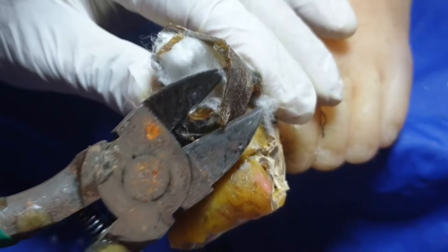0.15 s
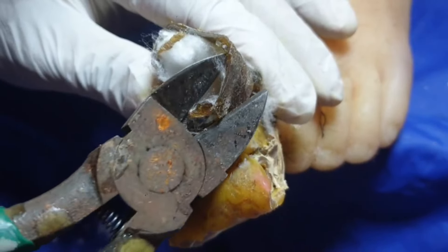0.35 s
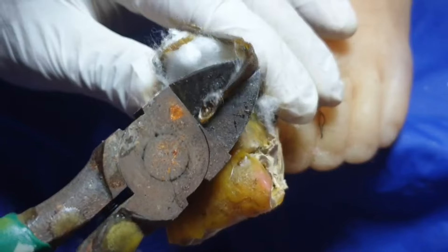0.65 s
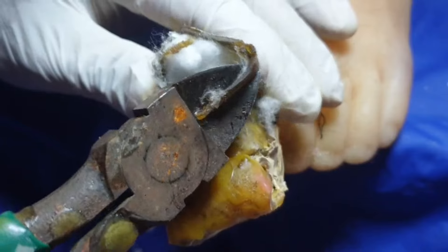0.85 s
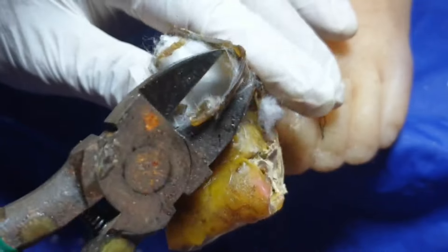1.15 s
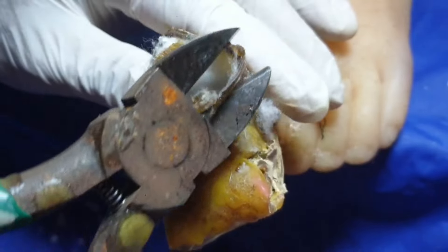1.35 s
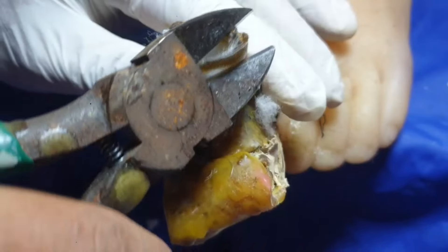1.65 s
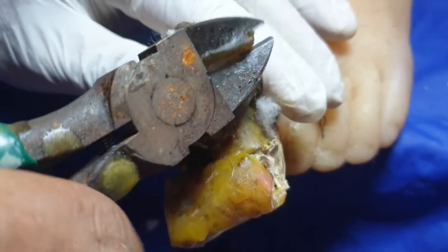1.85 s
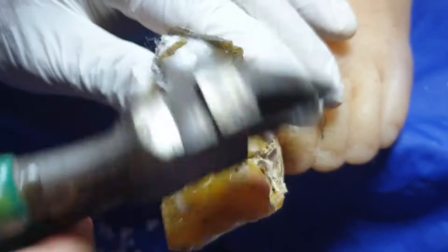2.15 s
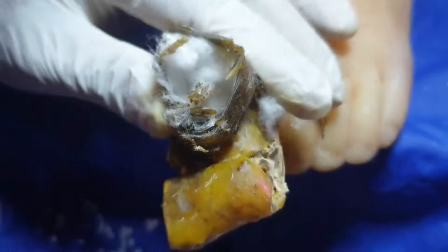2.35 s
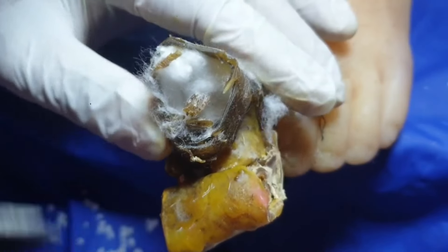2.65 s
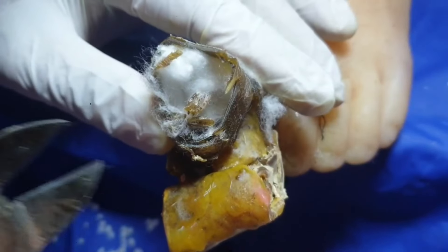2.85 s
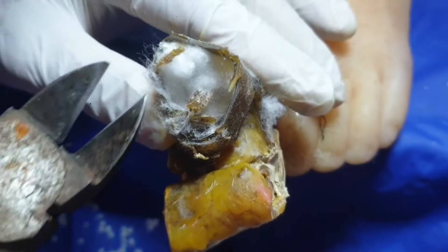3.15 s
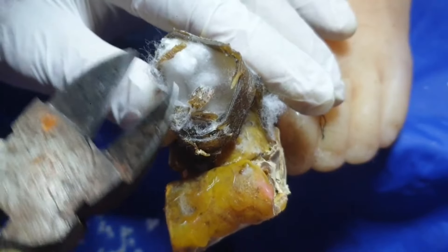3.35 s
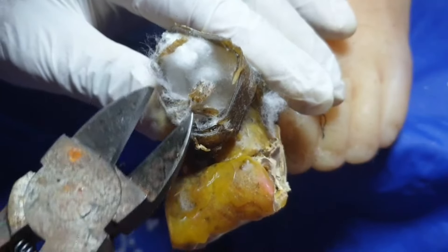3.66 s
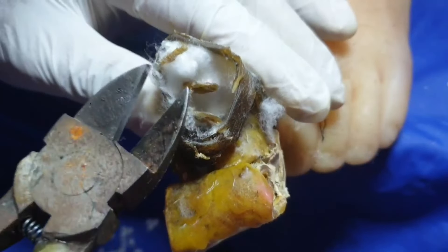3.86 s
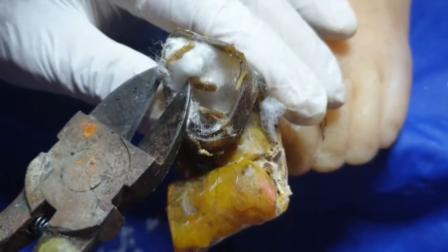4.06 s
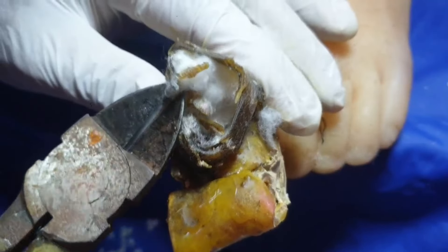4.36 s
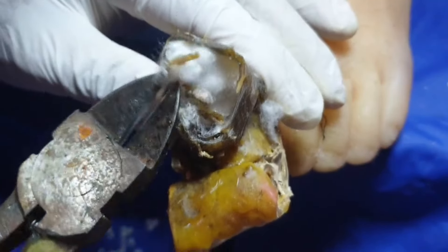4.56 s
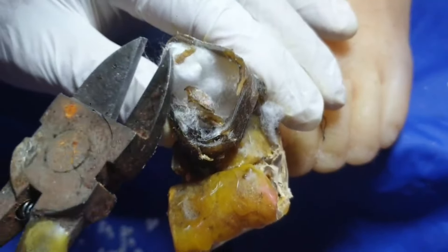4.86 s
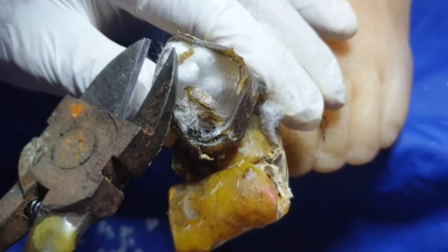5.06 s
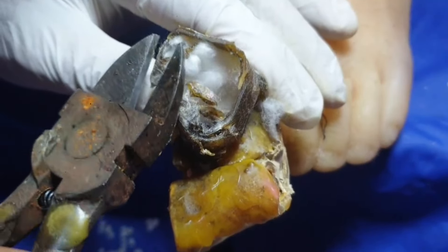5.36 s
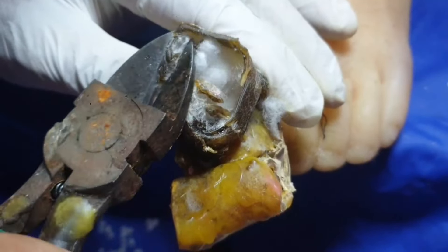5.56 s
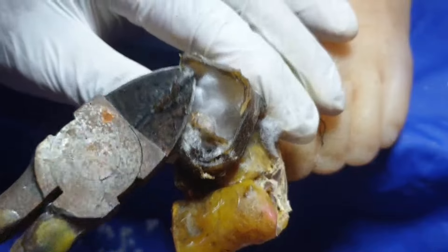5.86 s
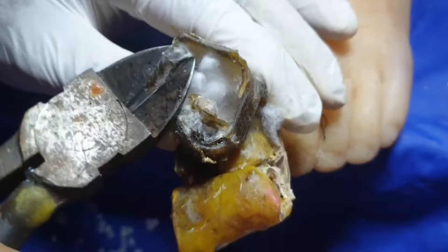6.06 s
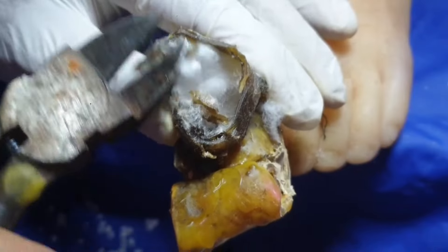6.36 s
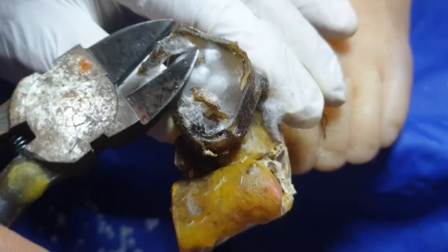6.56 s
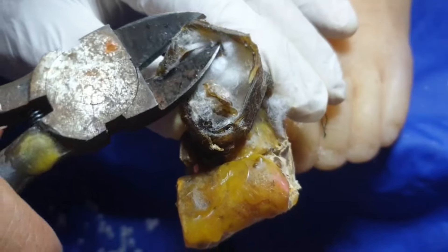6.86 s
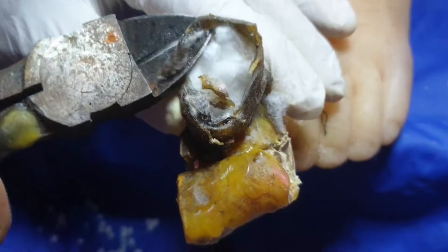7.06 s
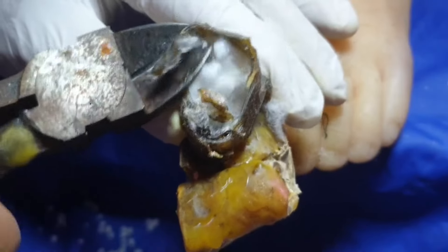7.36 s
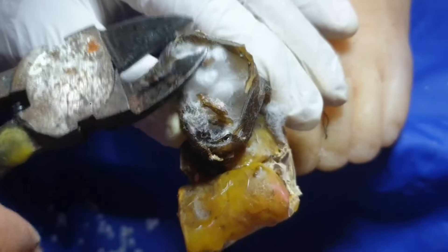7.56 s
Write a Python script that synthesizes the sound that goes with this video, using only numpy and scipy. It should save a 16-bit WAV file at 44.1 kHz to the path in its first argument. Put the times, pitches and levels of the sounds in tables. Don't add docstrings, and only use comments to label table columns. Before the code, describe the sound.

Heavy steel nippers creak and snap through a thick toenail in a bare, reverberant room, over steady air conditioner hum and draught.

```python
import sys
import numpy as np
from scipy import signal
from scipy.fft import rfft, irfft, next_fast_len
from scipy.io import wavfile

SR = 44100
rng = np.random.default_rng(int(sys.argv[2]) if len(sys.argv) > 2 else 0)


def int16_out(signal):
    q = np.round(np.clip(np.atleast_2d(signal).T, -1, 1) * 32767)
    wavfile.write(sys.argv[1], SR, q.astype(np.int16))


def boost(x):
    u = np.asarray(x, float) / 20
    return 10 ** u


N = 339570
SLOW = 40
LEFT_LAG = 5


def rms_one(x):
    return x / np.sqrt(np.mean(x ** 2) + 1e-20)


def at_hz(points, hz, column=1):
    points = np.array(points)
    return np.interp(np.log(hz + 1), np.log(points[:, 0]), points[:, column])


def at_samples(slow):
    return np.interp(np.arange(N) / SLOW, np.arange(len(slow)), slow)


def drift(hz):
    lowpass = signal.butter(2, hz, fs=SR / SLOW, output="sos")
    slow = signal.sosfilt(lowpass, rng.standard_normal(N // SLOW + 4002))[4000:]
    return at_samples(rms_one(slow))


def swell_db(peak_s, half_s, edge_db, sharp):
    t = np.arange(N // SLOW + 1) * SLOW / SR
    return edge_db * (np.abs(t - peak_s) / half_s) ** sharp


def resonate(x, hz, width_hz):
    r = np.exp(-np.pi * width_hz / SR)
    return signal.lfilter([(1 - r * r) / 2, 0, (r * r - 1) / 2], [1, -2 * r * np.cos(2 * np.pi * hz / SR), r * r], x)


# (frequency [Hz], left-right likeness [-1 to 1])
PORT_LIKENESS = [(60, 1), (150, 0.97), (380, 0.77), (950, 0.26), (2380, 0.17), (5980, -0.14),
                 (15000, -0.02)]
# (frequency [Hz], left minus right [dB])
PORT_LEAN = [(100, 0.5), (300, 1), (1000, 1), (2000, 1), (2800, -5.5), (4000, -1.5), (6000, -6),
             (7400, -8.5), (8000, 1), (9500, 2.5), (11000, 1.5), (15000, 2)]


def steady(spectrum, level_db, above_hz):
    size = next_fast_len(N)
    hz = np.fft.rfftfreq(size, 1 / SR)
    alike = np.clip(at_hz(PORT_LIKENESS, hz), 0, 1)
    shared, left, right = rfft(rng.standard_normal((3, size)))
    late = np.exp(-2j * np.pi * hz * LEFT_LAG / SR)
    common = shared * np.array([late, np.ones_like(late)])
    pair = np.sqrt(alike) * common + np.sqrt(1 - alike) * np.array([left, right])
    lean_db = at_hz(PORT_LEAN, hz) * np.array([[.5], [-.5]])
    pair = pair * boost(at_hz(spectrum, hz) + lean_db)
    measure = np.std(irfft(pair.mean(axis=0) * (hz > above_hz), size))
    return boost(level_db) / measure * irfft(pair, size)[:, :N]


# (frequency [Hz], level [dB per Hz])
HISS_COLOUR = [(2500, -18), (3300, -3.5), (4100, 2), (5100, -16), (6400, -29), (7400, -0.5), (7900, -22),
               (9200, -9.5), (10500, 0), (12200, 2.5), (15700, -5.5)]


def hiss():
    return steady(HISS_COLOUR, level_db=-80.5, above_hz=2500)


# (frequency [Hz], level [dB per Hz])
RUSH_COLOUR = [(30, -36), (45, -8.5), (103, -15.5), (170, -6.5), (228, -9), (300, -8), (420, -8.5),
               (560, -10), (800, -15), (990, -11), (1430, -16), (2170, -21), (3050, -29), (3600, -39.5)]


def air_rush():
    lowpass = signal.butter(2, 4200, fs=SR, output="sos")
    return signal.sosfilt(lowpass, steady(RUSH_COLOUR, level_db=-50.5, above_hz=180))


# (frequency [Hz], level [dB rms])
MOTOR_LINES = [(201.8, -54), (102.7, -68)]


def motor():
    t = np.arange(N) / SR
    hum = np.zeros(N)
    for hz, db in MOTOR_LINES:
        strength = boost(db + 3 + 1.1 * drift(2.7))
        hum += strength * np.sin(2 * np.pi * hz * t + 0.35 * drift(5.3))
    return np.array([np.roll(hum, LEFT_LAG), hum])


# (time of peak [s], level [dB], left minus right [dB], half length [s])
DRAUGHT_GUSTS = [(0.0, -34.5, -24, 0.028), (0.194, -43, -13, 0.073), (.3, -47.5, -2, 0.084),
                 (0.45, -40, -11, 0.09), (0.703, -49, -19, .12), (.9, -41, -11, 0.13),
                 (1.103, -45.5, 3, 0.17), (1.278, -49.5, 12, 0.047), (1.772, -47.5, -15, 0.067),
                 (1.987, -43, -9, .06), (1.92, -52, 13, 0.11), (2.19, -39, -24, 0.029),
                 (2.295, -50, -13, 0.12), (2.676, -43, -9, 0.12), (3.0, -53.5, -11, .15),
                 (3.34, -56, 1.5, .2), (3.634, -53.5, -11, 0.07), (4.63, -49.5, -0.1, .13),
                 (4.841, -39.5, 5, .08), (5.05, -42, 8, .09), (5.2, -46, -16, 0.16),
                 (5.613, -50.5, 13, .04), (5.95, -50.5, -24, .05), (6.05, -40, -17, .05),
                 (6.221, -44.5, -20.5, 0.17), (6.34, -34, -11, 0.048), (6.636, -40.5, -18, .11),
                 (6.83, -56, -15, 0.055), (7.36, -54.5, -11, .13), (7.652, -48, -21, .15)]


def draught():
    calm_db, edge_db, sharp = -66.5, -9.5, 1.5
    out = np.zeros((2, N))
    band = signal.butter(2, [45, 95], "band", fs=SR, output="sos")
    for side, sign in enumerate((1, -1)):
        gain = boost(calm_db)
        for s, db, pan_db, half_s in DRAUGHT_GUSTS:
            share = 1 / np.sqrt(1 + boost(-2 * sign * pan_db))
            gain = gain + share * boost(db + 4 + swell_db(s, half_s, edge_db, sharp))
        lumps = rng.standard_normal(N) * boost(0.83 * drift(19))
        out[side] = rms_one(signal.sosfilt(band, lumps)) * at_samples(gain)
    return out


# (time [s], peak level [dB], port [0 left, 1 right], swing [ms], first swing [+1 in, -1 out])
HARD_BUFFETS = [(2.201, -36, 1, 7, 1), (3.003, -33, 1, 4.8, 1), (4.701, -30.5, 1, 4.8, -1),
                (4.82, -23.5, 0, 4.1, -1), (4.924, -30, 0, 5.1, -1), (5.061, -32, 0, 5.3, 1),
                (5.162, -28.5, 1, 5.8, 1), (6.05, -30.5, 1, 9.9, 1), (6.195, -30, 1, 3.4, -1),
                (6.326, -27.5, 1, 1.47, 1), (6.334, -22.5, 1, 2.3, 1), (6.355, -36, 1, 4.8, 1),
                (7.6, -28, 1, 7, 1)]


def buffets():
    half = 1300
    out, t = np.zeros((2, N)), np.arange(-half, half) / SR
    for s, db, port, swing_ms, sign in HARD_BUFFETS:
        phase = t * 1000 * np.sqrt(2) / swing_ms
        at = round(s * SR) - half
        out[port, at:at + len(t)] -= sign * phase * np.exp(-phase ** 2) * boost(db + 7.5)
    return out


# (frequency [Hz], width [Hz], level [dB])
ROOM_SPREAD = [(11000, 2400, 3.5), (6460, 1800, -3.5), (4020, 390, 7.5), (2400, 1500, 3.5), (1570, 300, -4)]


def snaps_to_room():
    out, table = np.zeros(N), np.array(all_snaps())
    at = np.round(table[:, 0] * SR).astype(int)
    for part, (hz, width_hz, spread_db) in enumerate(ROOM_SPREAD):
        clicks = np.full(N, 1e-18)
        clicks[at] = boost(table[:, part + 1] + 29 + spread_db)
        out += resonate(clicks, hz, width_hz) * (-1) ** part
    return out


# (frequency [Hz], t60 [s], left level [dB], right level [dB])
WALL_ANSWER = [(1200, .5, -48, -47.5), (2440, 0.45, -45, -45), (3480, 0.74, -52.5, -50.5),
               (4020, 0.76, -50.5, -48), (4910, .6, -47, -40), (7200, 0.67, -48, -41.5),
               (8230, 0.51, -61, -56.5), (9260, 0.49, -49.5, -56), (11000, 0.5, -49, -50),
               (13050, 0.38, -49.5, -48.5), (14300, .4, -50, -50), (15160, 0.32, -58, -58)]


def walls(x):
    t = np.arange(round(.9 * SR)) / SR
    answer, edges = np.zeros((2, len(t))), np.geomspace(1000, 16000, 33)
    for low, high in zip(edges, edges[1:]):
        bandpass = signal.butter(2, [low, high], "band", fs=SR, output="sos")
        band = signal.sosfilt(bandpass, rng.standard_normal((2, len(t))))
        hz = np.sqrt(low * high)
        level_db = np.array([[at_hz(WALL_ANSWER, hz, column=2)], [at_hz(WALL_ANSWER, hz, column=3)]])
        answer += band * boost(level_db - 60 * t / at_hz(WALL_ANSWER, hz))
    answer *= np.clip((t - .004) / 0.01, 0, 1)
    return signal.fftconvolve(answer, x[None], axes=1)[:, :N]


# (frequency [Hz], width [Hz], left level [dB], right level [dB])
FRICTION_RINGS = [
    [(4470, 90, 2.5, -4)],
    [(5554, 40, -13, -3.5), (6020, 58, -21, 1.5), (6280, 140, -7.5, 4.5), (6680, 85, -12, -2.5)],
    [(9560, 44, 6.5, -19.5), (9980, 83.7, 4.5, -10), (9060, 120, 0.5, -25.5), (11920, 60, -10.5, -3)],
    [(11000, 80, 0.5, -26), (11400, 130, 5, -16.5), (10650, 55, -3, -4)],
]
# (time of peak [s], length [s], level [dB], place [0 pivot, 1 jaw, 2 blade, 3 tip])
FRICTION_STROKES = [(.19, 0.3, -79, 0.6), (.52, .16, -78, 1.5), (.726, .12, -72.5, 3),
                    (.72, .14, -78.5, 1.1), (1.114, .11, -71, 3), (1.116, .1, -73.5, 0.9),
                    (1.35, 0.37, -77.5, 1.25), (1.86, .04, -75, 1.5), (1.945, 0.037, -60.5, 3),
                    (1.98, .14, -70.5, 4), (1.96, .15, -77.5, 1), (2.342, 0.09, -71, 0.5),
                    (2.35, .13, -71, 3), (2.52, .06, -79, 2.5), (2.634, .14, -78, 1.7),
                    (3.27, .12, -83, 1.5), (4.06, .22, -83.5, 1.5), (4.34, .16, -69.5, 1.7),
                    (4.383, .04, -66, 4.5), (4.67, .24, -74, 1.1), (4.68, .18, -66.5, 3.5),
                    (4.718, .08, -66, -1), (5.73, .22, -75, 2), (5.813, .04, -66, 3), (6.2, 0.4, -76, 0.8),
                    (6.22, .18, -71, 3.5), (7.066, .08, -73.5, 3), (7.07, .1, -79, 1.5),
                    (7.455, .14, -73, 3), (7.494, .08, -72, .51)]


def creak():
    edge_db, sharp, loss_db_per_place = -12, 2.6, 12
    out = np.zeros((2, N))
    sizes = boost(3 * np.minimum(rng.exponential(1, N), 4)) * rng.choice([-1, 1], N)
    slips_per_s = 2500 * boost(5 * drift(25))
    grains = sizes * (rng.random(N) < slips_per_s / SR) + 0.18 * rng.standard_normal(N)
    for place, rings in enumerate(FRICTION_RINGS):
        gain = 0
        for s, length_s, db, at in FRICTION_STROKES:
            loss_db = loss_db_per_place * abs(place - at)
            gain = gain + boost(db - loss_db + swell_db(s, length_s / 2, edge_db, sharp))
        force = grains * at_samples(gain) + 1e-18
        for hz, width_hz, *ports_db in rings:
            scale = np.std(resonate(grains, hz, width_hz))
            late = rng.integers(0, 300)
            ringing = resonate(np.roll(force, late) * boost(3.9 * drift(20)), hz, width_hz) / scale
            out += ringing * boost(np.array(ports_db))[:, None]
    return out


# (time [s], tip level [dB], loss from tip to pivot [dB], shank level [dB], handle level [dB])
NAIL_BREAKS = [
    (.8013, -40, -11, -35.5, -29.5),
    (1.7645, -48.5, 3.5, -47.5, -66),
    (2.0272, -41, 4, -51, -39.5),
    (2.4572, -48, 2, -53, -51),
    (2.4602, -47.5, 7, -48.5, -55),
    (2.4655, -60, 1.5, -40, -54),
    (4.3971, -14, 5.5, -32.5, -36),
    (5.8275, -19, 0.1, -29.5, -34),
    (7.1412, -37, -1.5, -38.5, -45.5),
]
# (time [s], tip level [dB], loss from tip to pivot [dB])
BLADE_TICKS = [(.7816, -54.5, 5), (1.699, -58, 8), (1.999, -54, 19), (2.0195, -52, 18), (2.335, -60, -6),
               (2.4723, -44.5, 34), (2.4825, -62, 8), (2.4965, -59, 14), (4.346, -50.5, 23),
               (5.7482, -52, 7), (5.797, -47.5, 16), (7.0984, -51, 23), (7.1226, -49, 17), (7.1776, -53, 9)]


def all_snaps():
    jaw_share, tick_grip_db = .5, -67.5
    rows = list(NAIL_BREAKS) + [(*tick, tick_grip_db, tick_grip_db) for tick in BLADE_TICKS]
    snaps_db = []
    for s, tip, loss, shank, handle in rows:
        snaps_db.append((s, tip, tip - jaw_share * max(loss, 0), tip - loss, shank, handle))
    return sorted(snaps_db)


# (frequency [Hz], t60 [s], left level [dB], right level [dB])
STEEL_MODES = [
    [(8930, 0.0057, -1, -15.5), (9550, 0.01, 3.5, -17.5), (10160, .01, 0, -3), (10850, .012, 1, -10.5),
     (11240, 0.0032, 13, -12), (10560, 0.013, -8, -5.5), (12400, .012, -11, -15), (12500, .012, -10, -11),
     (12560, .012, -17.5, -19), (14500, .01, -21.5, -23.5)],
    [(5910, .012, -8, 2), (6500, 0.013, -4.5, -2), (7080, .014, -5.5, 3.5), (7250, 0.0079, -10, -4)],
    [(4030, .02, -8.5, 2), (4390, .016, -12.5, -12.5)],
    [(2089, 0.018, -3, 2), (2594, 0.026, -1.5, -2), (3290, 0.027, -12.5, -14.5)],
    [(1563, 0.031, 5.5, 2), (1410, .015, -15.5, -14.5)],
]


def snaps():
    tear_s, splinter_hz = .0015, 5500
    out, t = np.zeros((2, N)), np.arange(round(.06 * SR)) / SR
    splinters = np.where(t < tear_s, .012, 0.034 * np.exp(-((t - tear_s) / 0.0027) ** 2))
    choke = np.exp(-(t / 0.01) ** 4)
    for s, *parts_db in all_snaps():
        at, mode = round(s * SR), 0
        free = np.clip((max(parts_db) + 54) / 32, .3, 1)
        for modes, part_db in zip(STEEL_MODES, parts_db):
            for hz, t60, *ports_db in modes:
                noise = rng.standard_normal((2, len(t)))
                force = noise * splinters * min(hz / splinter_hz, 1)
                force[:, round(tear_s * SR)] += (-1) ** mode * free * np.array([.6, .2])
                ring_s = t60 * (free if hz > splinter_hz else np.sqrt(free))
                width_hz = np.log(1000) / np.pi / ring_s
                ringing = resonate(force, hz, width_hz) * choke
                energy = np.array([[.36], [.2]]) * SR / (4 * np.pi * width_hz)
                ringing *= np.sqrt(energy / np.sum(ringing ** 2, axis=1, keepdims=True))
                out[:, at:at + len(t)] += ringing * boost(part_db + 6 + np.array(ports_db))[:, None]
                mode += 1
    return signal.sosfilt(signal.butter(3, [1250, 13800], "band", fs=SR, output="sos"), out)


def scene():
    background = hiss() + air_rush() + motor() + draught() + buffets()
    rubbing = creak()
    room = walls(snaps_to_room() + boost(-0.5) * rubbing.sum(axis=0))
    return background + room + rubbing + snaps()


def low_pass(x):
    return signal.sosfilt(signal.butter(12, 15810, fs=SR, output="sos"), x)


def record(dry):
    dry = dry - 0.6 * resonate(dry, 8120, 930)
    dry = signal.sosfilt(signal.butter(2, 31, "high", fs=SR, output="sos"), dry)
    mix = signal.sosfilt(signal.ellip(8, .5, 60, 15780, fs=SR, output="sos"), dry)
    return low_pass(mix)


dry = scene()
out = record(dry)
int16_out(out)
```